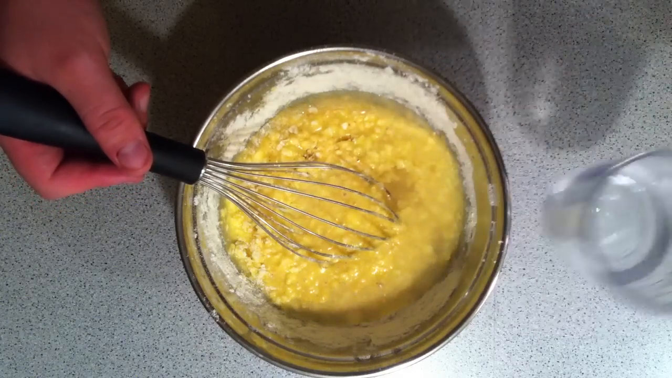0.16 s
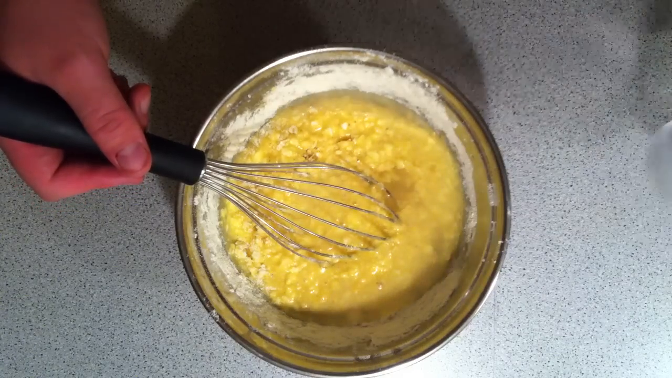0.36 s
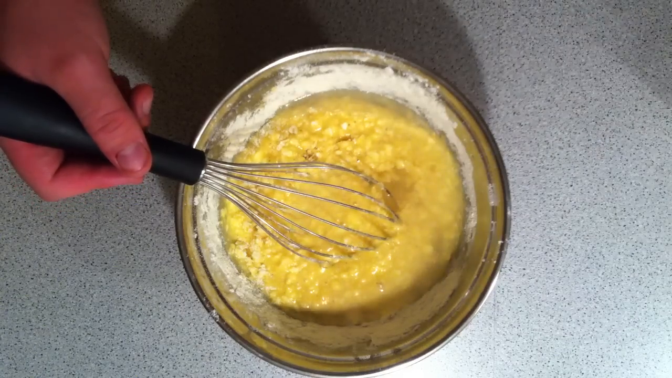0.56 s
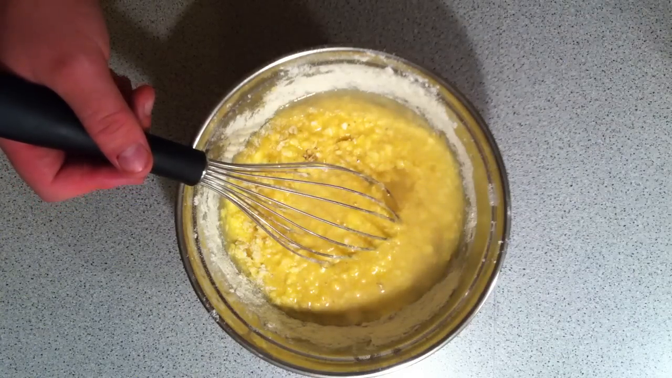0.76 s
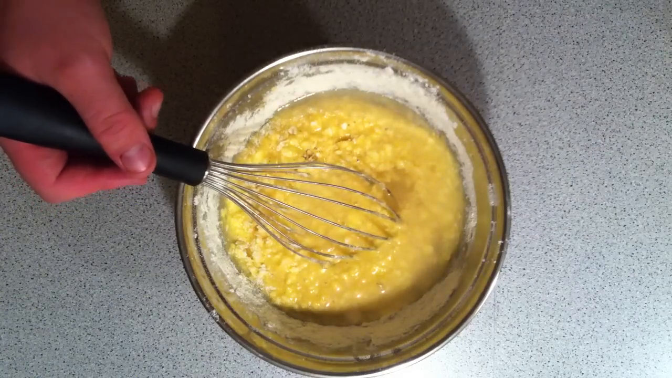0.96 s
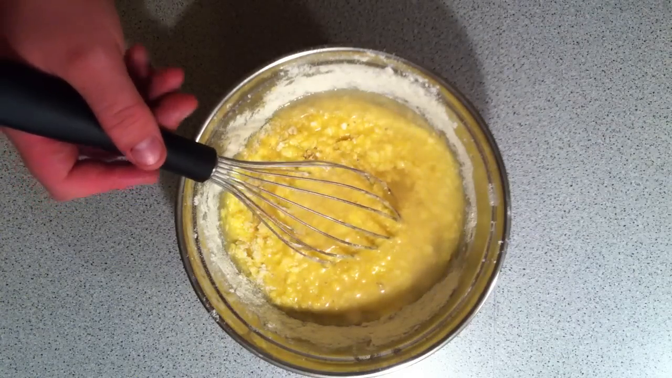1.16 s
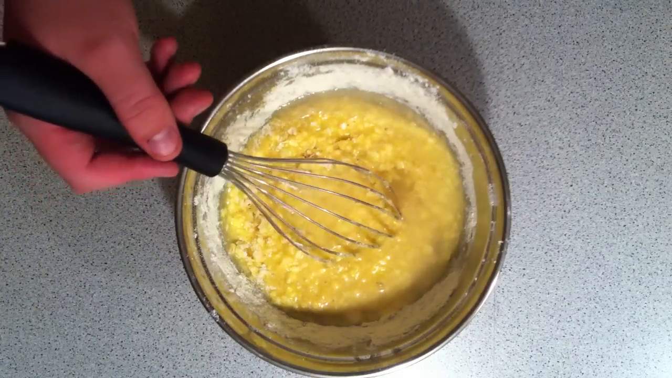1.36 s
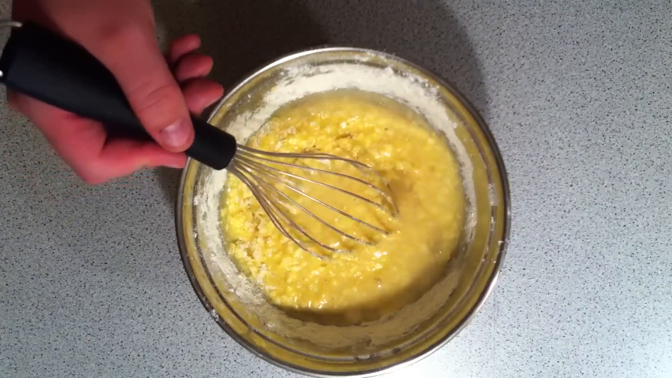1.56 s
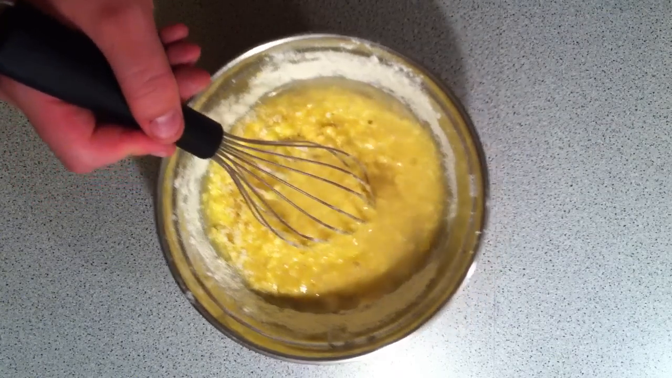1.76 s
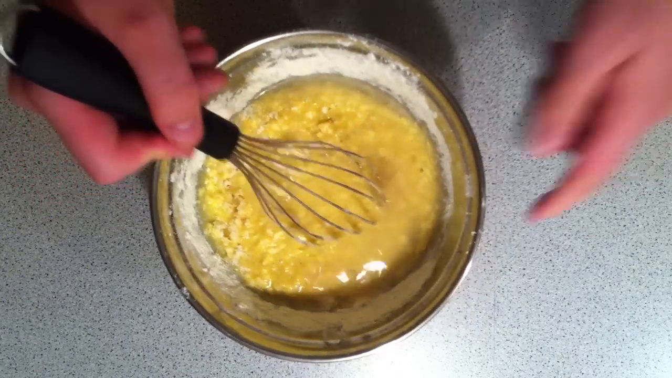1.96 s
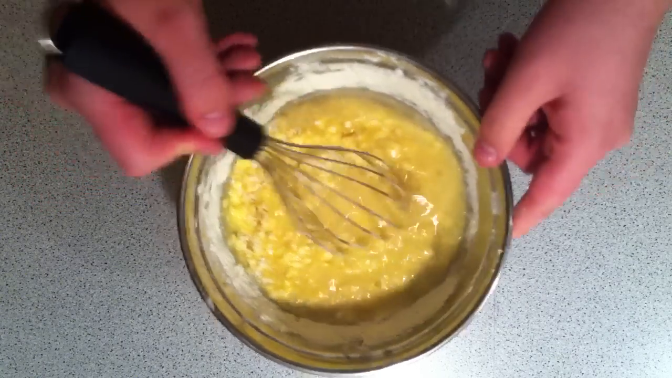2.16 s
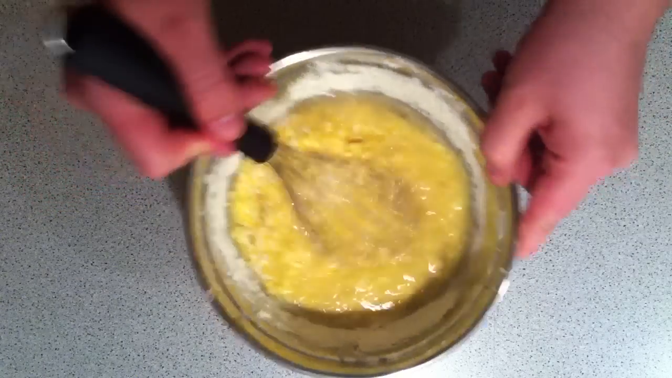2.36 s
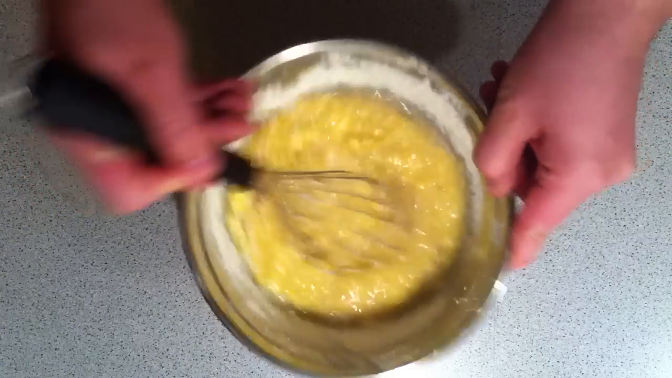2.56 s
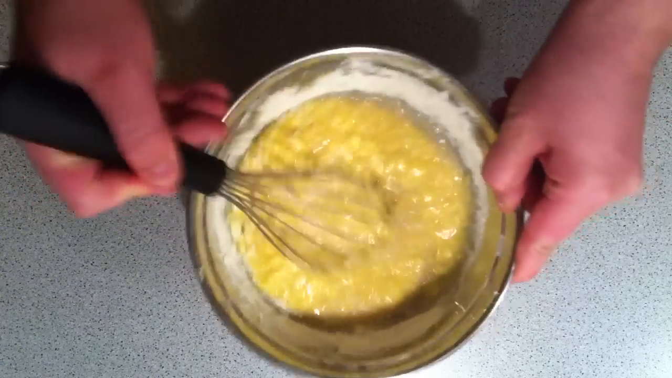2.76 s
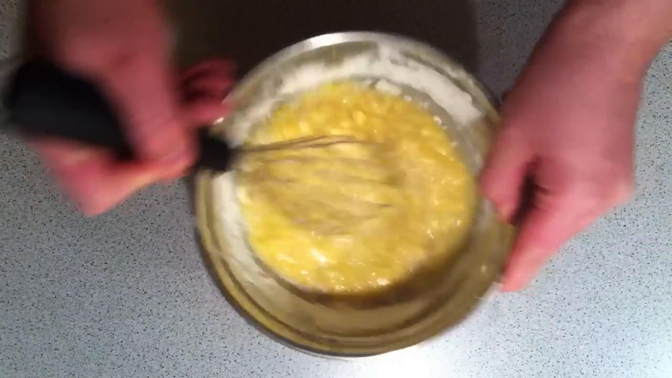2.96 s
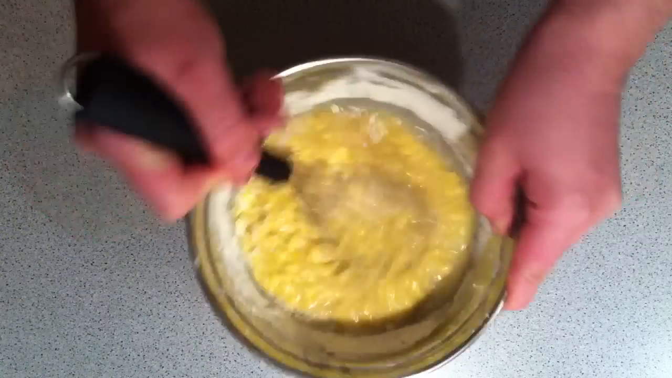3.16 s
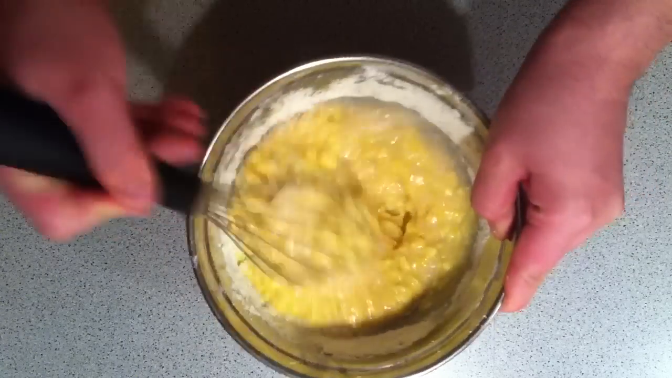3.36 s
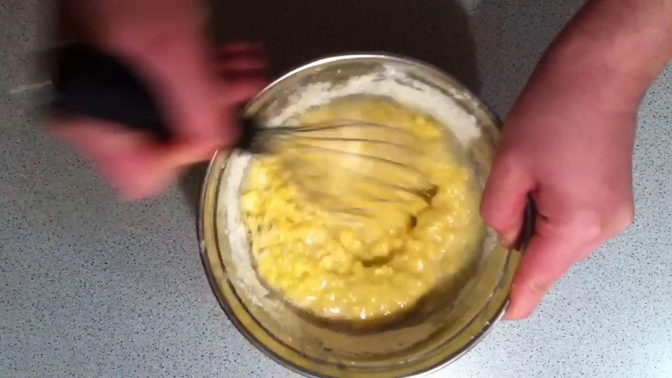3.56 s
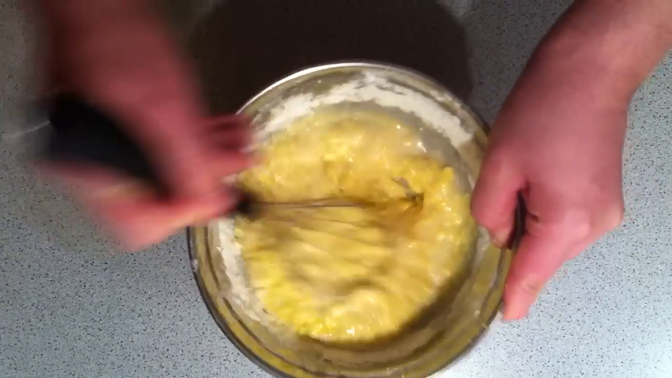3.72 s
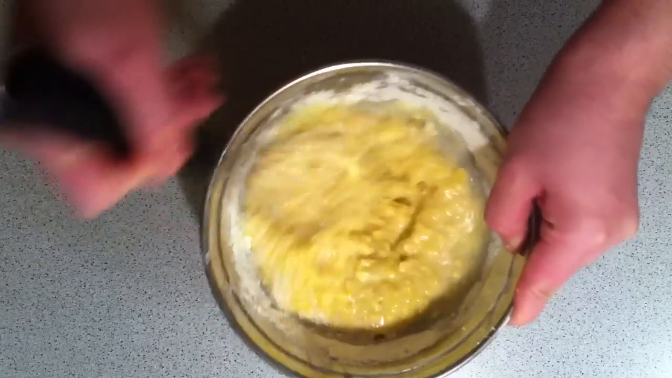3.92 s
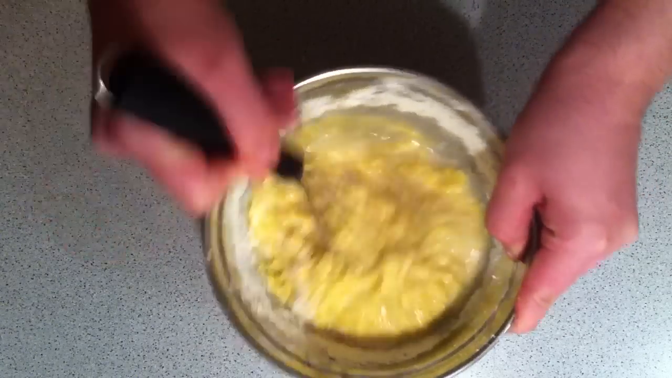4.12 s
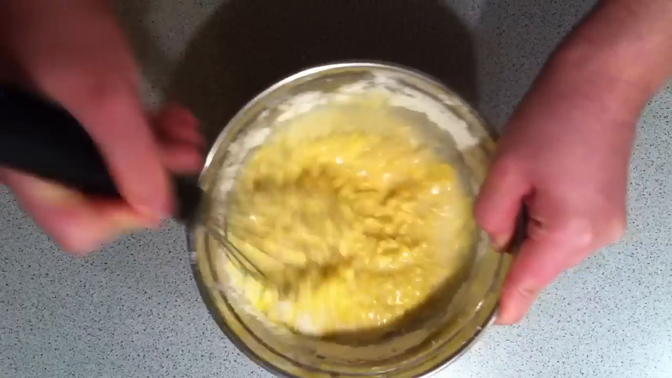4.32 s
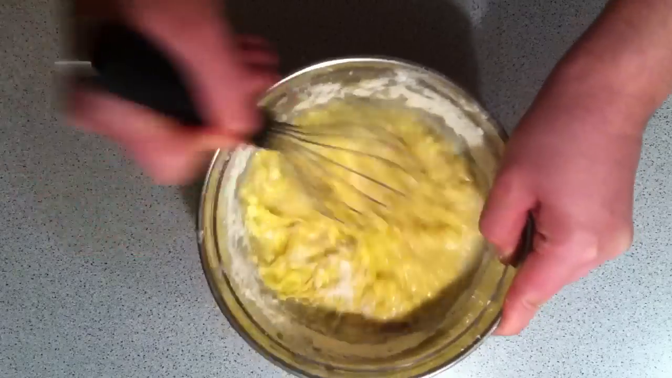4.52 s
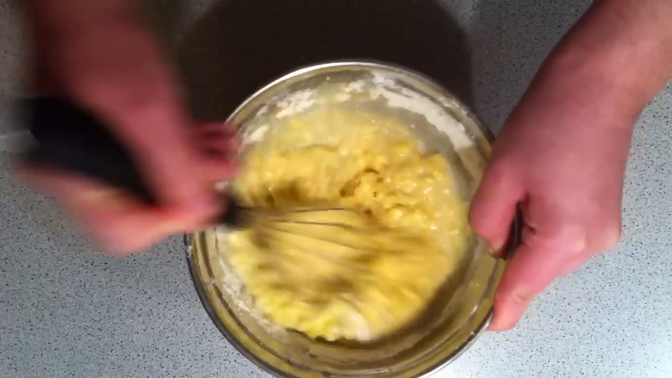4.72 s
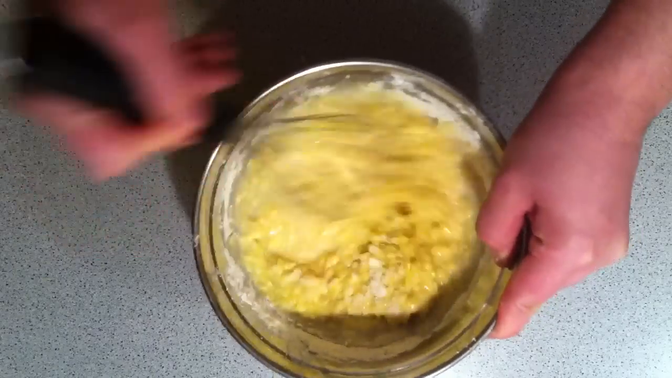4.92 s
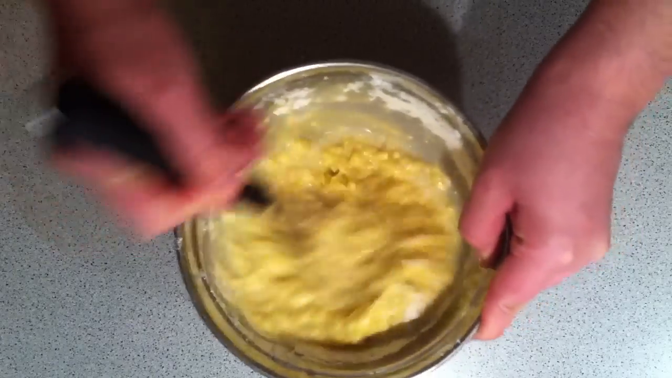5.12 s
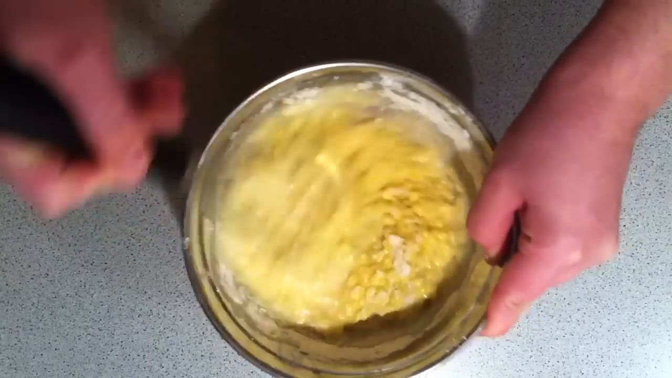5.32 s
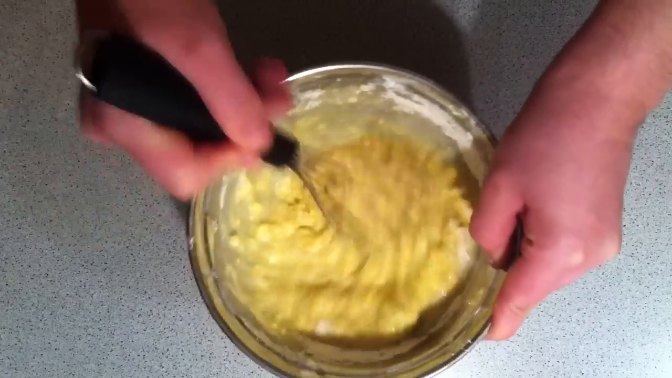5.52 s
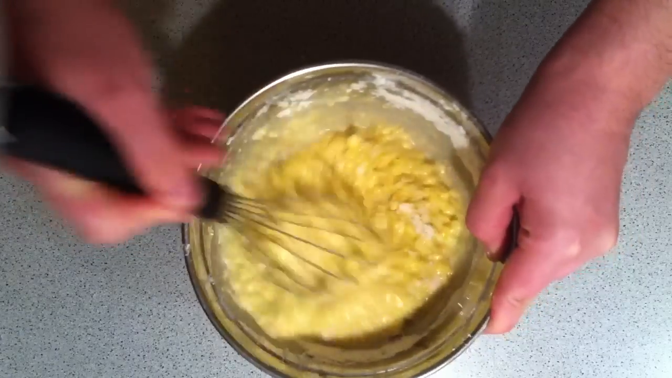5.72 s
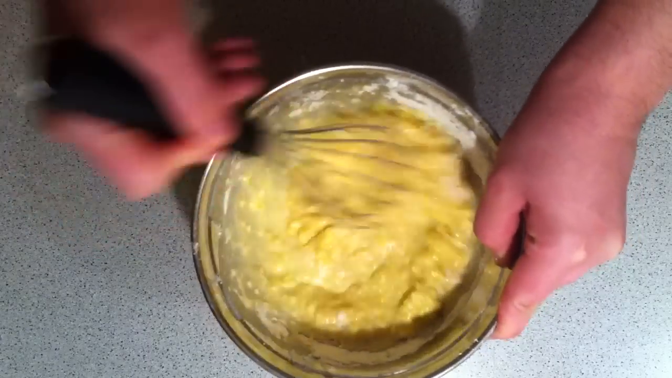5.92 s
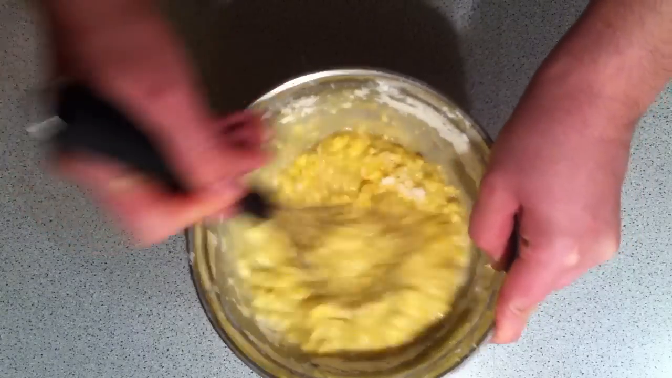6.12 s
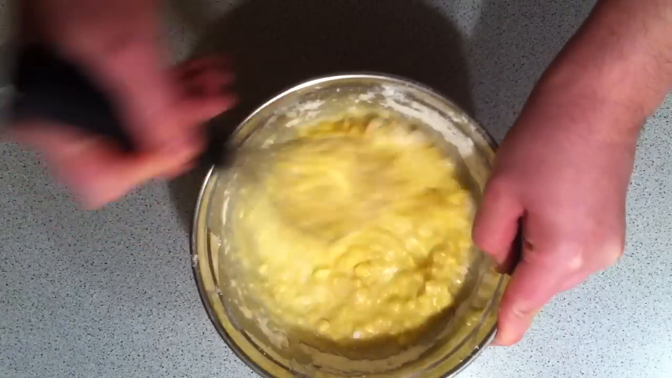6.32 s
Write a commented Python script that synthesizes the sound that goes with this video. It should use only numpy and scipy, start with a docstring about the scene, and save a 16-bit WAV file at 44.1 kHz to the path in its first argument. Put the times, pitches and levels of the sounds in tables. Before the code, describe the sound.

A quiet small kitchen, heard close, with low steady room air. For the first second there is almost nothing but the faint rub of a wire whisk resting in a steel bowl of batter, with a tiny squeak near 0.7 s. At about 1.2 and 1.4 s the whisk knocks twice on the rim, short and dull-metallic, the second with a brief low squeak. A soft scrape comes at 1.7 s. Stirring begins near 2.2 s; the bowl rocks on the worktop, with the loudest hollow double bump at 2.6 s, a clustered clank at 2.9 and another at 3.1. From about 3.2 s to the end at roughly 6.4 s, strokes run about three a second: low rubbing rumble, wet squelching, small bubbly pops, thin scratchy wire flicks, strongest near 3.9 s, and occasional faint high squeaks. The later strokes grow slightly softer, and the bowl's ring is quickly damped.

```python
"""Quiet room air and the faint rub of a resting whisk come first; then the whisk knocks twice on a bowl's rim.
Stirring follows, about three strokes a second: the first strokes rock the steel bowl on a kitchen worktop.
Blows ring the bowl as fading sine waves; rubbing feeds random slips through its resonances.
The batter squelches (tiny ringing cavities) and pops (short rising tones).
The wires scrape, tick and ring (shaped noise and narrow resonances), and steel squeaks now and then."""
import sys
import numpy as np
from scipy import signal
from scipy.fft import rfft, irfft, next_fast_len
from scipy.io import wavfile

SR = 44100
rng = np.random.default_rng(int(sys.argv[2]) if len(sys.argv) > 2 else 0)


def materialize(psi):
    """Save the field psi as 16-bit PCM at rate SR to the path in sys.argv[1].

    A 1-D psi becomes a single channel; in a 2-D psi each row is a channel.
    """
    bounded = np.clip(np.atleast_2d(psi).T, -1, 1)
    quanta = np.round(bounded * 32767).astype(np.int16)
    wavfile.write(sys.argv[1], SR, quanta)


N = 281358  # length of the scene in samples

# The whisk bears on the bowl, with lighter touches between. Each row: start in seconds, length in seconds,
# drag on the base in dB, rubbing on the wall in dB, batter squelch in dB (all before the layers' own trims).
STROKES = [(.19, .04, -63, -78, -78), (1.782, .11, -54.5, -60.5, -73), (2.176, 0.043, -61, -50, -72),
           (2.352, 0.037, -55, -59.5, -81), (2.451, 0.025, -49, -49.5, -70),
           (2.538, 0.068, -50, -57, -66.5), (2.813, .05, -46.5, -52.5, -71), (3.03, 0.052, -45, -44.5, -63),
           (3.224, 0.05, -47.5, -46, -63.5), (3.543, 0.075, -52, -54.5, -63.5),
           (3.754, 0.019, -50, -58, -60), (3.856, .11, -52.5, -53, -62.5),
           (4.073, 0.21, -52.5, -56.5, -61.5), (4.42, 0.076, -49.5, -53.5, -70),
           (4.589, .04, -59.5, -56.5, -59), (4.724, 0.24, -53.5, -59, -64.5),
           (5.092, 0.097, -51, -54.5, -64), (5.273, 0.05, -56.5, -59.5, -72),
           (5.462, 0.15, -55, -58, -71.5), (5.863, 0.071, -58.5, -60.5, -69), (6.147, 0.14, -59, -61, -71)]
# A wire flicks off the wall. Each row: start in seconds, level in dB.
FLICKS = [(3.536, -66), (3.662, -59.5), (3.919, -48), (4.048, -64.5), (4.182, -53), (4.446, -56),
          (4.613, -62), (4.664, -58), (5.187, -62), (5.522, -56.5), (5.685, -66), (5.911, -62),
          (6.222, -60)]
# Ring of the bowl with batter, standing on the worktop.
# Each row: pitch in Hz, level in dB, time to fade by 60 dB in seconds (when struck).
BOWL = [(105.1, -13, 0.41), (150, -26, 0.23), (174, -2, 0.21), (189.2, -5, 0.31), (216.7, 0.5, 0.26),
        (240.7, -5, 0.44), (352, -13.5, 0.044), (385.8, -9.5, 0.12), (450, -13, 0.062), (520, -12.5, 0.14),
        (630, -6, 0.07), (673, -3.5, 0.14), (675.6, -14.5, 0.066), (762, -36, 0.19), (851, -33, 0.45),
        (926.4, -9, 0.17), (1105, -17.5, 0.11), (1159, -10.5, 0.11), (1307, -38, 0.14), (1456, -23, 0.2),
        (1710, -28, 0.19), (2440, -30, 0.17), (2800, -31, 0.13)]


def from_db(db):
    """Turn decibels into a gain."""
    return 10 ** (np.asarray(db) / 20)


def to_db(gain):
    """Turn a gain into decibels."""
    return 20 * np.log10(gain + 1e-9)


def rms_one(x):
    """Scale a signal to an rms of 1."""
    return x / np.sqrt(np.mean(x ** 2) + 1e-20)


def seconds(length):
    """Sample times of a sound of this length."""
    return np.arange(int(length * SR)) / SR


def at_hz(points, hz):
    """Read a table on a log-frequency axis."""
    known_hz, values = np.transpose(points)
    return np.interp(np.log(np.maximum(hz, 1)), np.log(known_hz), values)


def add(track, s, sound):
    """Mix a sound into a track at a given time."""
    start = int(s * SR)
    track[start:start + len(sound)] += sound[:N - start]


def colour(x, spectrum):
    """Filter a signal by a table of dB over frequency, then scale it to an rms of 1."""
    size = next_fast_len(N)
    gains = from_db(at_hz(spectrum, np.fft.rfftfreq(size, 1 / SR)))
    return rms_one(irfft(rfft(x, size) * gains, size)[:N])


def drift(rate):
    """Slow chance with an rms of 1: straight lines between random values, rate values a second."""
    knots = rng.standard_normal(4000)
    return rms_one(np.interp(np.arange(N) / SR * rate, np.arange(len(knots)), knots))


def grains(per_s, spread_db, clump_db, clump_rate):
    """Random clicks of uneven size, whose level swells and sinks so that they clump."""
    sizes = from_db(spread_db * np.minimum(rng.exponential(1, N), 4))
    signed_sizes = sizes * rng.choice([-1, 1], N)
    happens = rng.random(N) < per_s / SR
    # the tiny offset keeps filters away from exact silence
    return signed_sizes * happens * from_db(clump_db * drift(clump_rate)) + 1e-18


def resonate(x, hz, width_hz):
    """Two-pole resonance with gain 1 at its top."""
    r = np.exp(-np.pi * width_hz / SR)
    feed = np.array([1, 0, -1]) * (1 - r * r) / 2
    feedback = [1, -2 * r * np.cos(2 * np.pi * hz / SR), r * r]
    return signal.lfilter(feed, feedback, x)


def air():
    """The kitchen's quiet air is steady noise with a spectrum of its own."""
    # Each row: frequency in Hz, relative level in dB per Hz.
    air_spectrum = [(15, -82), (25, -6), (69, -41), (93, -7), (164, 3), (322, -16), (410, -12.5),
                    (826, -14.5), (1170, -15), (1300, -14.5), (1620, -16), (15500, -20)]
    return from_db(-65) * colour(rng.standard_normal(N), air_spectrum)


def resting():
    """Until stirring begins, the held whisk shifts slightly on the base; its drag level in dB."""
    until_s, level_db, waver_db, waver_per_s = 2, -67, 1, 9
    wavering_db = level_db + waver_db * drift(waver_per_s)
    return np.where(np.arange(N) < until_s * SR, wavering_db, -np.inf)


def pressure(levels_db, release_db_per_s, glide_db):
    """Contact level in dB: each stroke swells, holds and eases off into a light glide for the turn."""
    attack_db_per_s, turn_s = 252, 0.27
    t, out = np.arange(N) / SR, np.full(N, -np.inf)
    for (s, length, *_), db in zip(STROKES, levels_db):
        before = np.maximum(s - t, 0)
        after = np.maximum(t - s - length, 0)
        # the glide, too, fades once the turn is over
        glide = glide_db - release_db_per_s * np.maximum(t - s - turn_s, 0)
        easing = np.maximum(-release_db_per_s * after, glide)
        out = np.maximum(out, db - attack_db_per_s * before + easing)
    return out


def rubbing(drag_db, wall_db, split_hz=470, drag_tilt_db=0.5, wall_tilt_db=2.0, slosh_db=0.0,
            damping_hz=0.62, catch_db=-8):
    """Dragged wires make tiny slips and harder catches that sound the bowl's modes; the batter sloshes along."""
    # Each row: frequency in Hz, relative level in dB per Hz.
    slosh_spectrum = [(400, -4.5), (640, 16), (800, -4.5), (1150, 8.5), (1400, -17), (2400, -32)]
    catches = rms_one(grains(per_s=70, spread_db=2.5, clump_db=1.0, clump_rate=25))
    slips = rms_one(grains(per_s=1200, spread_db=1.0, clump_db=1.0, clump_rate=69))
    slips = slips + from_db(catch_db) * catches
    base, wall = np.zeros(N), np.zeros(N)
    for hz, db, t60 in BOWL:
        octaves = np.log2(hz / split_hz)
        width = np.log(1000) / (np.pi * t60) + damping_hz
        ring = t60 * resonate(slips, hz, width)
        # low modes sound the drag on the base, high ones the rubbing on the wall
        if hz < split_hz:
            base += from_db(db + drag_tilt_db * octaves) * ring
        else:
            wall += from_db(db + wall_tilt_db * octaves) * ring
    wall = rms_one(rms_one(wall) + from_db(slosh_db) * colour(slips, slosh_spectrum))
    return from_db(drag_db - 3.5) * rms_one(base) + from_db(wall_db - 3.5) * wall


def squelch(level_db, cycles=9.6):
    """Films of batter tear behind the wires; each tiny cavity rings for a few cycles."""
    # Each row: frequency in Hz, relative level in dB.
    squelch_spectrum = [(600, 17), (1300, 6.5), (2000, 3.5), (2600, 1.5), (3500, 4), (5000, -4.5),
                        (8000, -4)]
    tears = grains(per_s=900, spread_db=-0.5, clump_db=6.0, clump_rate=60)
    pitches = np.geomspace(900, 7000, 16)
    dealt = rng.integers(0, len(pitches), N)  # each tear goes to one random pitch
    cavities = np.zeros(N)
    for k, hz in enumerate(pitches):
        cavities += resonate(tears * (dealt == k) + 1e-18, hz, hz / cycles)
    return from_db(level_db - 3.0) * colour(cavities, squelch_spectrum)


def bursts(hits, spectrum, attack_s, hold_s, t60):
    """Hard contacts (seconds, dB): each chatters as noise for some milliseconds and dies."""
    t, envelope = seconds(.15), np.zeros(N)
    for s, db in hits:
        fade = from_db(db - 60 * np.maximum(t - hold_s, 0) / t60)
        add(envelope, s, fade * np.minimum(t / attack_s, 1))
    return envelope * colour(rng.standard_normal(N), spectrum)


def wires(scrape_db, ring_db=4.5):
    """Wires scratch and flick along the wall, and narrow resonances make them ring thinly."""
    # Ring of the wires. Each row: pitch in Hz, width in Hz, relative level in dB.
    wire_modes = [(2040, 80, -2), (3680, 80, -4), (4220, 45, 0), (4450, 50, -3), (5400, 50, -4),
                  (5740, 55, -3), (7780, 160, -4), (9640, 50, -6), (11200, 90, -8)]
    # Scratching, then flicking. Each row: frequency in Hz, relative level in dB per Hz.
    scrape_spectrum = [(2000, -59), (4000, -15), (5500, 2), (8000, 3), (10500, 1), (13000, -1.5),
                       (15500, -0.5)]
    flick_spectrum = [(500, -32), (1500, -12), (4000, 4.5), (8000, 5.5), (11000, 5), (15500, -8)]
    scratches = grains(per_s=9100, spread_db=1.0, clump_db=4.0, clump_rate=120)
    scratch = from_db(scrape_db - 5.5) * colour(scratches, scrape_spectrum)
    touch = scratch + bursts(FLICKS, flick_spectrum, attack_s=0.00061, hold_s=0.0059, t60=0.098)
    ring = sum(from_db(db) * resonate(touch, hz, width) for hz, width, db in wire_modes)
    return touch + from_db(ring_db) * ring


def squeaks():
    """Steel sticks and slips on steel: noise feeds one resonance for as long as the contact holds."""
    # Each row: start in seconds, length in seconds, pitch in Hz, width in Hz, level in dB.
    contacts = [(0.707, 0.075, 815, 260, -64.5), (.72, 0.093, 3160, 800, -73), (1.39, .036, 390, 33, -49.5),
                (1.699, 0.1, 734, 260, -61), (1.70, 0.079, 2920, 900, -77),
                (2.409, 0.077, 7520, 250, -68.5), (3.027, .06, 7800, 300, -68),
                (3.308, 0.11, 3600, 150, -70), (3.847, 0.046, 7700, 260, -63),
                (4.831, 0.37, 2090, 90, -71.5)]
    out = np.zeros(N)
    for s, length, hz, width, db in contacts:
        size = len(seconds(length))
        # keep the end of one second, when the resonance has settled
        tone = rms_one(resonate(rng.standard_normal(SR), hz, width)[-size:])
        add(out, s, from_db(db) * tone * signal.windows.tukey(size, .4))
    return out


def knocks(hits, modes, crack, build_s, low_hz, vary_db, detune=0.0154):
    """A blow rings all modes, the low ones building up more slowly, and adds a noisy contact crack."""
    hz, mode_db, t60 = np.array(modes).T[:, :, None]
    t, out = seconds(.6), np.zeros(N)
    build_up = 1 - np.exp(-(t / build_s) ** 2 * hz / low_hz)
    envelopes = from_db(mode_db - 60 * t / t60) * build_up
    low = 1 / (1 + (hz / low_hz) ** 4)  # near 1 for low modes, near 0 for high ones
    for s, db, weight_db, crack_db in hits:
        strength, shift = rng.standard_normal((2, *hz.shape))
        # grip and batter retune the wall a little each time
        tuned_hz = hz * (1 + detune * (1 - low) * shift)
        rings = np.sin(2 * np.pi * tuned_hz * t) * envelopes
        add(out, s, (from_db(db + weight_db * low + vary_db * strength) * rings).sum(axis=0))
    contacts = [(s, crack_db) for s, _, _, crack_db in hits]
    return out + bursts(contacts, crack, attack_s=0.0053, hold_s=0.0051, t60=0.06)


def rim_knocks():
    """The whisk's neck strikes the rim and sounds the modes of the whisk lying against it."""
    # Each row: start in seconds, level in dB, extra weight of the low modes in dB, contact crack in dB.
    rim_hits = [(1.1738, -36, 1.5, -45), (1.4218, -38, -1.5, -37)]
    # Each row: pitch in Hz, level in dB, time to fade by 60 dB in seconds.
    whisk_modes = [(111.4, -13, 0.16), (151, -2.5, 0.095), (191, -20.5, 0.75), (240.5, -11, 0.31),
                   (397, -4, 0.097), (430, -7.5, 0.074), (620, -7, 0.025), (619, -7.5, 0.18),
                   (662.5, -0.5, 0.078), (946, -20.5, 0.25), (1094, -21.5, 0.19), (1125, -11, 0.094),
                   (1677, -18, 0.28), (1715, -13, 0.095), (3390, -14, 0.048), (3910, -26, 0.15)]
    # Each row: frequency in Hz, relative level in dB per Hz.
    rim_crack = [(500, 9.5), (1050, 15.5), (1400, 0), (1900, 8.5), (2600, -6), (4500, -7.5), (6300, -10.5),
                 (15000, -36)]
    return knocks(rim_hits, whisk_modes, rim_crack, build_s=0.0029, low_hz=324, vary_db=2.5)


def bowl_bumps():
    """Bumps ring the bowl and add its thud, which the batter damps quickly."""
    # Each row: start in seconds, level in dB, extra weight of the low modes in dB, contact crack in dB.
    bumps = [(2.141, -61, 12, -76), (2.192, -47.5, 1.5, -68), (2.636, -23.5, -0.5, -38),
             (2.6415, -25, -5.5, -33), (2.9325, -36, -7, -46), (2.938, -32.5, 2.5, -36.5),
             (2.946, -35, 4, -47.5), (3.117, -29, -3, -37.5), (3.535, -51, -7, -46.5),
             (3.837, -66, -20, -54), (5.272, -63.5, 14, -50.5), (5.408, -54, 7.5, -66),
             (5.520, -47.5, -19, -46.5), (6.220, -71, -14, -46.5)]
    # Each row: pitch in Hz, level in dB, time to fade by 60 dB in seconds.
    thud_modes = [(172, -3, 0.013), (417, -2, 0.076), (630, 2, 0.061), (1067, -14, 0.039)]
    # Each row: frequency in Hz, relative level in dB per Hz.
    bowl_crack = [(200, 14), (500, 3), (1150, 18), (1600, 4.5), (2400, 0), (3300, -7.5), (6700, -5.5),
                  (9000, -11), (15000, -37)]
    return knocks(bumps, BOWL + thud_modes, bowl_crack, build_s=0.0038, low_hz=362, vary_db=3.5)


def pops(cycles=8.4, rise=0.046, scatter=0.12, spread_s=.006, count=4):
    """A larger air pocket bursts as a cluster of bubbles, each rising in pitch as it dies."""
    # Each row: start in seconds, level of each bubble in dB, middle pitch in Hz.
    pockets = [(3.365, -44.5, 4000), (3.535, -43.5, 1070), (3.645, -41.5, 4960), (3.664, -43.5, 2290),
               (3.712, -46.5, 3780), (3.839, -41.5, 1010), (3.921, -34.5, 3900), (5.274, -43.5, 1650),
               (5.684, -44.5, 2290), (5.772, -47.5, 1300), (5.794, -47.5, 4900), (5.810, -50.5, 2100),
               (6.163, -49, 3080)]
    t, out = seconds(.05), np.zeros(N)
    for s, db, hz in pockets:
        for k in range(count):
            pitch = hz * np.exp(scatter * rng.standard_normal())
            age = t * pitch / cycles  # 1 when the bubble has faded by 60 dB
            rising_hz = pitch * (1 + rise * np.minimum(age, 1))
            phase = 2 * np.pi * np.cumsum(rising_hz) / SR
            add(out, s + spread_s * k / count, from_db(db - 60 * age) * np.sin(phase))
    return out


def spatter():
    """Each flick throws a little batter, which patters down at once; a gain for the squelch."""
    above_flick_db, t60_s = 2, 0.088
    t, out = seconds(.3), np.zeros(N)
    for s, db in FLICKS:
        add(out, s, from_db(db + above_flick_db - 60 * t / t60_s))
    return out


def echo(x):
    """Add one late, dull reflection from a wall."""
    delay_s, level_db, top_hz = .039, -17, 463
    late = np.interp(np.arange(N) - delay_s * SR, np.arange(N), x, left=0)
    low_pass = signal.butter(1, top_hz, fs=SR, output="sos")
    return x + from_db(level_db) * signal.sosfilt(low_pass, late + 1e-18)


def kitchen(x, wet_db, gap_s=0.0085):
    """Dense wall reflections build up after a short gap; each frequency band dies at its own pace."""
    # Each row: frequency in Hz, time to fade by 60 dB in seconds.
    fade_times = [(100, 0.28), (500, 0.4), (2000, 0.37), (8000, 0.49), (15000, 0.34)]
    t = seconds(.6)
    white, tail = rng.standard_normal((2, len(t))), 0
    edges = np.geomspace(62, 16000, 9)
    for k, (low, high) in enumerate(zip(edges, edges[1:])):
        band_pass = signal.butter(2, [low, high], "band", fs=SR, output="sos")
        band = signal.sosfilt(band_pass, white[k % 2])  # neighbouring bands use different noise
        tail = tail + band * from_db(-60 * t / at_hz(fade_times, np.sqrt(low * high)))
    tail = tail * (1 - np.exp(-(t / gap_s) ** 2))
    tail = tail / np.sqrt(np.sum(tail ** 2))
    return x + from_db(wet_db) * signal.fftconvolve(x, tail)[:N]


def scene():
    """Knocks and stirring in the kitchen, over its quiet air."""
    _, _, drags, walls, wets = np.transpose(STROKES)
    steel = dict(release_db_per_s=210, glide_db=-15)
    drag_db = np.maximum(pressure(drags, **steel), resting())
    wall_db = pressure(walls, **steel)
    wet_db = pressure(wets, release_db_per_s=70, glide_db=-2.5)
    squelch_db = to_db(np.hypot(from_db(wet_db), spatter()))
    scrape_db = -20 + 0.69 * wet_db  # the scrape follows 0.69 of the squelch's swing in dB
    batter = squelch(squelch_db) + pops() + wires(scrape_db) + squeaks()
    bowl = echo(bowl_bumps()) + rubbing(drag_db, wall_db)
    sound = kitchen(bowl, wet_db=-8) + kitchen(echo(rim_knocks()) + batter, wet_db=-4.0)
    # the microphone cuts the lows of all sounds but the room air
    low_cut = signal.butter(4, 98, "high", fs=SR, output="sos")
    return (signal.sosfilt(low_cut, sound) + air())[None]


def record(dry):
    """The top is cut steeply above 15750 Hz."""
    return signal.sosfilt(signal.ellip(12, .1, 70, 15750, fs=SR, output="sos"), dry)


dry = scene()
out = record(dry)
materialize(out)
```